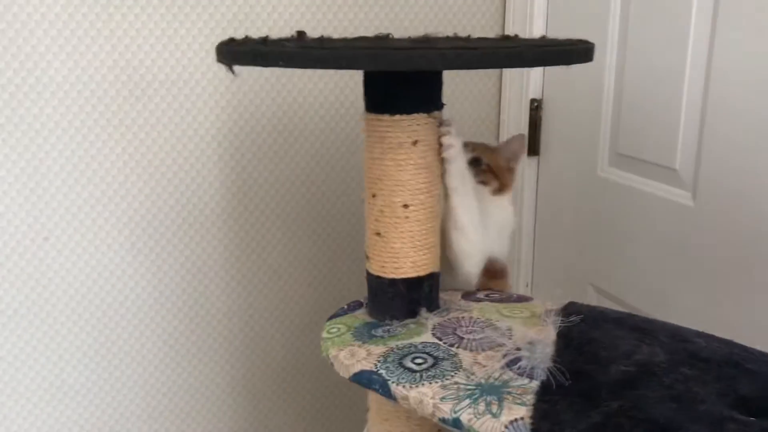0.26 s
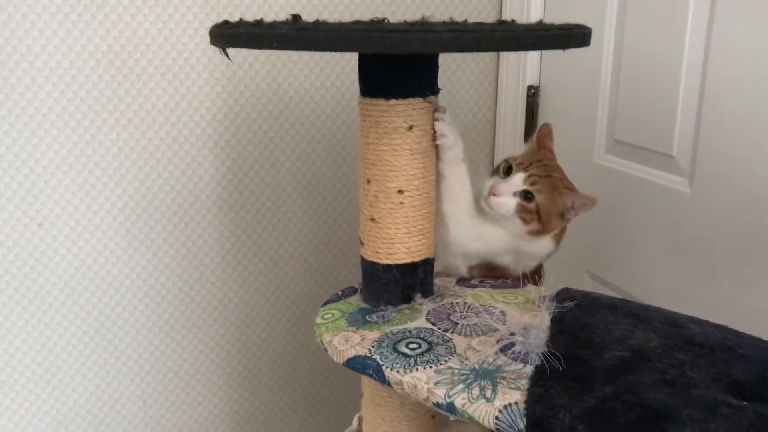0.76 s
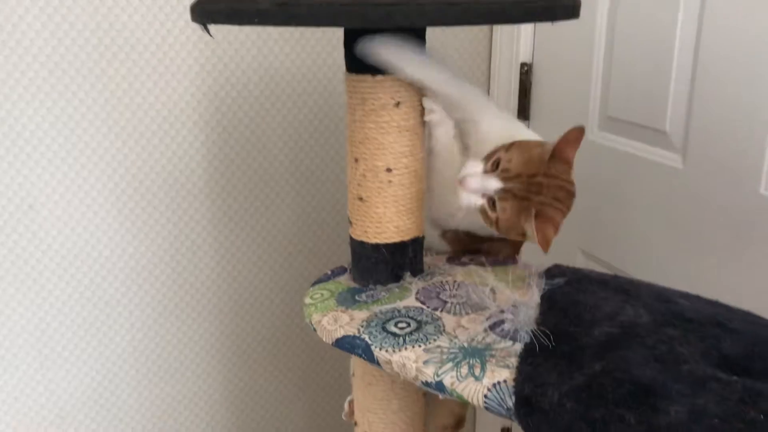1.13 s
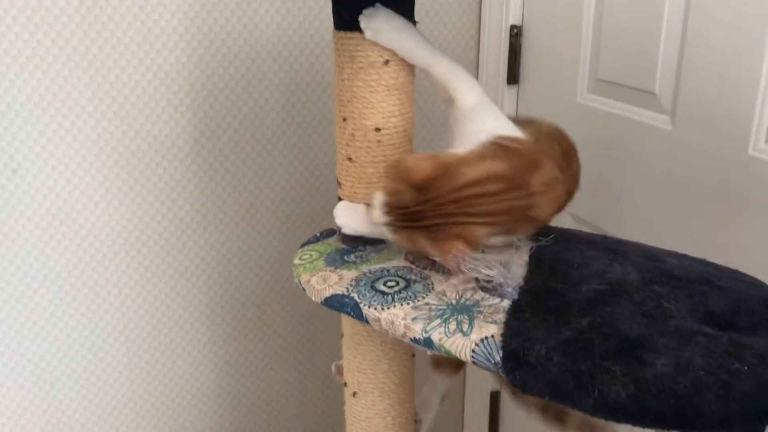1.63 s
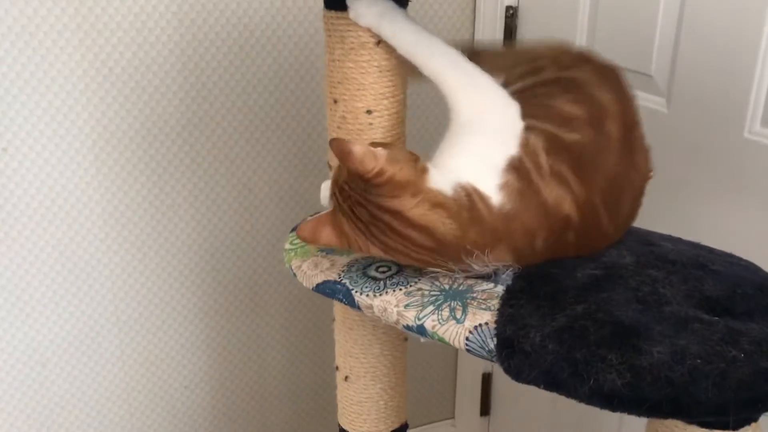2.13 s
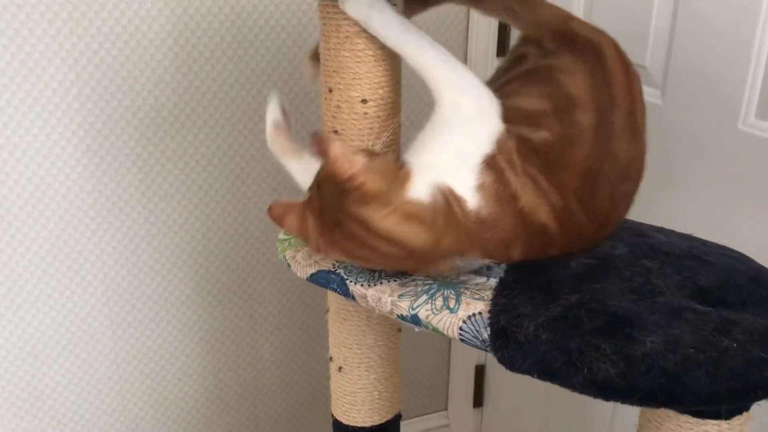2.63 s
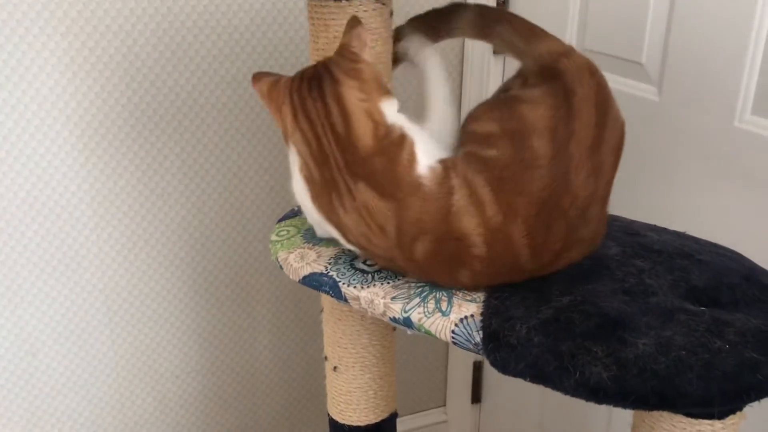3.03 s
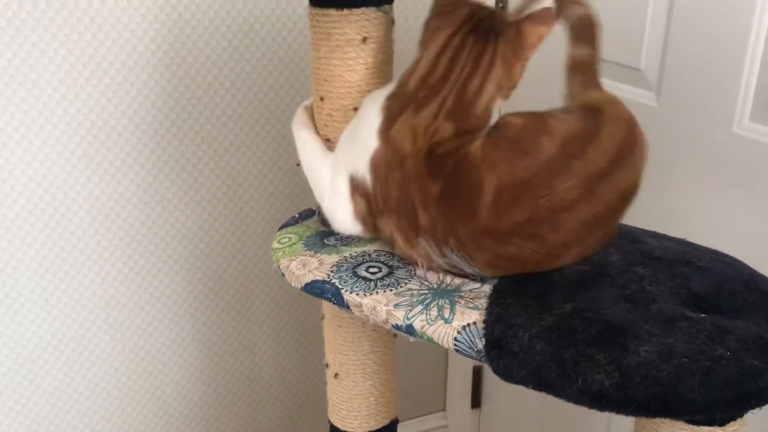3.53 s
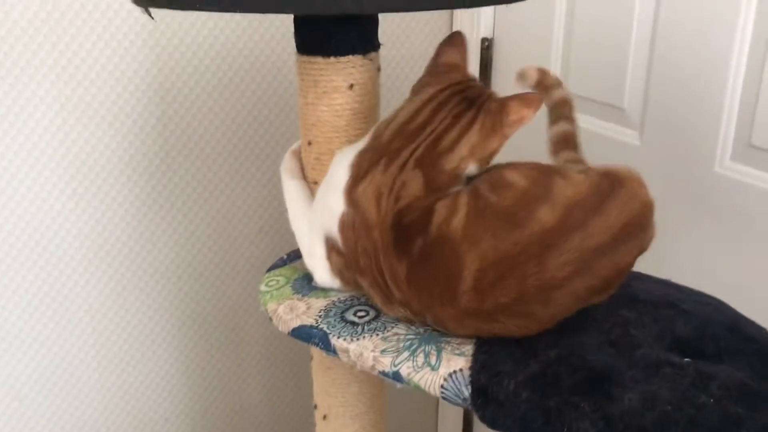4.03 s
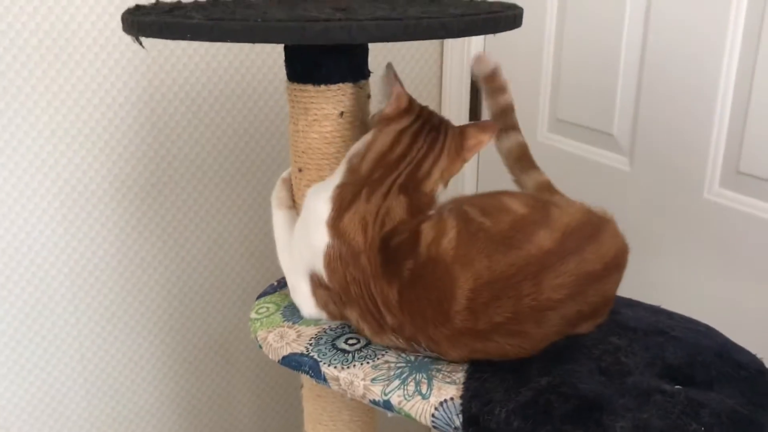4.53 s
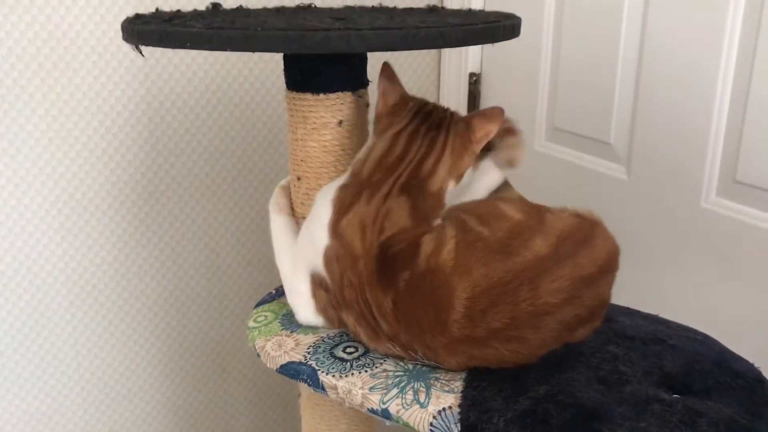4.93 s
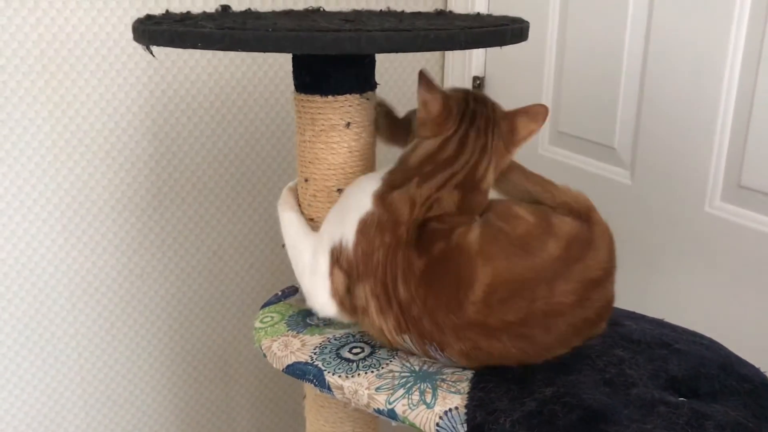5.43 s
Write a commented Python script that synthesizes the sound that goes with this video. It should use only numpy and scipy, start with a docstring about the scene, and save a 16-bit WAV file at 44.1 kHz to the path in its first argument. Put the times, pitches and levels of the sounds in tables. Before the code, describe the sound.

A cat moves on a carpeted climbing tree in a small, quiet, slightly reflective room. A brief flurry of crackling claws and wooden knocks comes first, with a low shudder of the structure. Then come irregular claw ticks, short fibre rips, padded bumps and faint fur rubbing, thinning towards near stillness before one last woody tap. The microphone is fairly near, with soft steady hum and hiss.

```python
"""A cat scrabbles on a carpeted climbing tree in a small quiet room: claws snag and tear out of rope and
cloth as short bursts of fibre snaps, which set boards, post and fibre resonances ringing.
Knocks and bright claw clicks are struck modes, soft bumps are fast-dying sines, rubbing fur is dense
fine snaps. The tree lurches with a shudder of narrow low noise, over a steady low hum near 57 Hz
that slowly fades, and a faint room hum of coloured noise."""
import sys
import numpy as np
from scipy import signal
from scipy.fft import rfft, irfft, next_fast_len
from scipy.io import wavfile
from scipy.ndimage import uniform_filter1d

SR = 44100
rng = np.random.default_rng(int(sys.argv[2]) if len(sys.argv) > 2 else 0)


def elevation(decibels):
    """Turn decibel levels (scalar or array-like) into linear amplitude ratios."""
    levels = np.asarray(decibels, float)
    return 10 ** (levels / 20)


def output_pcm(signal):
    """Save a mono or channel-first signal as 16-bit PCM at the path in sys.argv[1].

    Samples are clipped to [-1, 1] before scaling.
    """
    pcm = np.clip(np.atleast_2d(signal).T, -1, 1) * 32767
    wavfile.write(sys.argv[1], SR, np.round(pcm).astype(np.int16))


N = 249606  # length in samples


def rms_one(x):
    """Scale to rms 1."""
    return x / np.sqrt(np.mean(x ** 2) + 1e-20)


def band(x, low_hz, high_hz):
    """Butterworth band-pass."""
    sos = signal.butter(2, [low_hz, high_hz], "band", fs=SR, output="sos")
    return signal.sosfilt(sos, x)


def coloured(x, spectrum):
    """Shape x by a spectrum drawn over log frequency; rms 1."""
    hz, db = np.transpose(spectrum)
    size = next_fast_len(N)
    grid = np.maximum(np.arange(size // 2 + 1) * SR / size, 1)
    gain = elevation(np.interp(np.log(grid), np.log(hz), db))
    return rms_one(irfft(rfft(x, size) * gain, size)[:N])


def ring(x, hz, t60):
    """Two-pole resonance: a unit click sets a sine of height 1 ringing, down 60 dB after t60 seconds."""
    radius = elevation(-60 / (t60 * SR))
    angle = 2 * np.pi * hz / SR
    poles = [1, -2 * radius * np.cos(angle), radius * radius]
    return signal.lfilter([0, np.sin(angle)], poles, x + 1e-18)


def snaps(per_s, spread_db):
    """Random fibre snaps of uneven size and sign; rms 1."""
    sizes = elevation(spread_db * np.minimum(rng.exponential(1, N), 4))
    signs = rng.choice([-1, 1], N)
    return rms_one(sizes * signs * (rng.random(N) < per_s / SR))


def swells(peak_s, peak_db, swell_s, fade_s):
    """Gain of overlapping gestures, each rising to its peak and fading, 20 dB in the given times."""
    t = np.arange(N) / SR
    swell_s, fade_s = np.maximum(swell_s, .003), np.maximum(fade_s, .003)
    power = np.zeros(N)
    for s, db, up, down in np.broadcast(peak_s, peak_db, swell_s, fade_s):
        distance = np.maximum((s - t) / up, (t - s) / down).clip(0, 8)
        power += elevation(2 * db - 40 * distance)  # doubled dB: power
    return np.sqrt(power)


# claw and paw contacts: t/s, post ring level/dB, board thud level/dB over ring,
# claw sharpness level/dB over ring, tear time constant t/ms (held within 0.5 to 14)
CONTACTS = [(0.017, -35.5, -7, -12.5, 9.8), (0.0259, -35, -12, -0.5, 4.1), (0.067, -43.5, -17, -1, 4.2),
            (0.088, -49, -17, -7, 2.8), (0.113, -41, -2, -3.5, 9.9), (0.119, -31, -8, -5.5, 9.2),
            (0.128, -35, -15, -10, 2.5), (0.145, -25, -38, -8, 5.4), (0.154, -28.5, -8, -5, 4.8),
            (0.1617, -32, -3.5, -6, 5.5), (0.1807, -33, -30, 3.5, 4.8), (0.185, -27.5, -7.5, -22, 3.05),
            (0.187, -43, -11, -6, 1.8), (0.243, -29, -36, -10.5, 4), (0.393, -53.5, -17, -7, 6.1),
            (0.553, -59.5, -12, -2.5, 16), (0.665, -42.5, -3.5, -9.5, 17), (0.762, -60, -12, 1.5, 4.2),
            (0.81, -38.5, -4, -10.5, 5.2), (0.895, -55.5, -19, -6.5, 3.6), (0.94, -48, -16, -3.5, 18.8),
            (0.949, -42.5, -14, -8.5, 7.2), (0.952, -36, -7, -12.5, 2.3), (1.139, -58.5, -13, -6.5, 15.96),
            (1.18, -43.5, -20, -3, 5.9), (1.25, -61.5, -2, -1, 4.9), (1.302, -40.5, -14, -8.5, 2),
            (1.306, -33.5, -10, -12, 3.7), (1.316, -39, -3, -9, 4.2), (1.313, -31, -4.5, -23, 15),
            (1.683, -56, -15, 3, 21), (1.811, -54.5, -3.5, -1.5, 21), (1.879, -47, 6, -13, 2.9),
            (1.955, -47.5, -11, -17, 12), (2.003, -41.5, -12.5, -15, 3.5), (2.128, -53.5, -5, -3.5, 20),
            (2.476, -49, -0.5, -18.5, 16), (2.591, -50, 2.5, -14.5, 11), (2.741, -52, 3.5, -17, 6.5),
            (2.747, -50.5, -20, -17, 4.1), (2.754, -47.5, -5, -14, 6.4), (2.875, -45, -9, 2, 0.45),
            (2.877, -38.5, 1.5, -5.5, 5.5), (2.91, -46, -3, -16, 7.2), (3.1766, -55, -9, 7, 2),
            (3.372, -63, -20, -7.5, 1.5), (3.465, -41, -8.5, -12.5, 6.7), (3.485, -54.5, 6, 0.5, 18),
            (3.506, -42.5, -23, -15, 3.4), (3.556, -47, 3.5, -5.5, 10), (3.569, -48.5, -14, 2, 3.1),
            (3.667, -58, -12, -4.5, 7.9), (4.618, -69, -1, 1, 2.6), (4.647, -51, -27, -11, 18)]


def tears(level_db, fibres):
    """Each contact opens with a sharp snap, then fibres give way at a dying strength."""
    out = np.zeros(N)
    for (s, *_, length_ms), db in zip(CONTACTS, level_db):
        at = round(s * SR)
        length = np.clip(length_ms, .5, 14) * SR / 1000
        fade = np.exp(-np.arange(min(int(6 * length), N - at)) / length)
        tear = fade * fibres[at:at + len(fade)]
        tear[0] = 2.0  # opening snap
        out[at:at + len(fade)] += elevation(db) * tear / np.sqrt(np.sum(tear ** 2))
    return out


def struck(modes, level_db, fibres):
    """Every contact excites every mode with a strength of its own; neighbouring modes alternate in sign."""
    chance_db = rng.normal(0, 2.5, (len(CONTACTS), len(modes)))
    out = np.zeros(N)
    for k, (hz, db, t60) in enumerate(modes):
        # shifted fibres give each mode its own grain
        push = tears(level_db + db + chance_db[:, k], np.roll(fibres, 997 * k))
        out += (-1) ** k * ring(push, hz, t60)
    return out


# board modes: f/Hz, level/dB, t60 t/s
BOARDS = [(166, -8.5, 0.19), (256, -5.5, 0.049), (365, -3, 0.036), (479, -17, 0.066), (511, -8, 0.084),
          (563, -6, 0.051)]
# rope-wound post modes: f/Hz, level/dB, t60 t/s
POST = [(642, -5, 0.024), (780, -1.5, 0.022), (897, 2, 0.018), (1060, 3.5, 0.015), (1109, -8, 0.059),
        (1242, -1.5, 0.027), (1477, -2, 0.017), (1792, 5, 0.0083), (2160, 9.5, 0.004)]
# hollow snap of claw on fibre: f/Hz, level/dB, t60 t/s
FIBRE = [(2530, 1, 0.0051), (3280, 3.5, 0.0048), (4270, 5.5, 0.0039), (5560, 7.5, 0.00071),
         (6700, 7.5, 0.0017)]


def contacts():
    """Tears drive boards, post and fibre resonances, plus a bare crackle and a dry opening click."""
    _, ring_db, thud_db, sharp_db, _ = np.transpose(CONTACTS)
    claw_db = ring_db + sharp_db
    crackle_low_hz, crackle_top_hz, click_top_hz = 3620, 10740, 16700
    fibres = snaps(12000, spread_db=3)
    boards = band(struck(BOARDS, ring_db + thud_db - 3.0, fibres), 78.0, 940.0)
    post = band(struck(POST, ring_db - 6.0, fibres), 320.0, 3900)
    fibre = band(struck(FIBRE, claw_db + 7, fibres), 2610, 10500)
    loose_fibres = snaps(2000, spread_db=4.5)
    crackle = band(tears(claw_db + 26, loose_fibres), crackle_low_hz, crackle_top_hz)
    # without fibres only the opening snap is left
    click = band(tears(claw_db + 19, np.zeros(N)), crackle_low_hz, click_top_hz)
    return boards + post + fibre + crackle + click


# knocks and bright claw clicks on wood and fibre: t/s, level/dB, centre f/Hz,
# fall-off level/dB one octave away
KNOCKS_AND_CLICKS = [(.001, -35, 166, 22), (0.024, -28.5, 163, 38), (.118, -32, 991, 9),
                     (.157, -17, 760, 17), (0.125, -33, 166, 25), (0.16, -24, 165, 20), (0.19, -40, 570, 7),
                     (0.156, -49, 3300, 28), (0.166, -34, 3270, 28), (0.18, -54, 3280, 37),
                     (1.715, -50.5, 1010, 13), (0.953, -34, 1950, 36), (1.184, -42.5, 2050, 31),
                     (1.311, -33.5, 1650, 30), (1.864, -34.5, 300, 5), (2.589, -42, 328, 5),
                     (2.759, -46.5, 2750, 34), (2.763, -46, 2750, 34), (2.878, -34, 540, 11),
                     (3.156, -56, 344, 1), (3.184, -44.5, 1040, 23), (3.558, -32.5, 750, 4.5),
                     (4.647, -56, 1270, 29), (5.42, -32.5, 730, 8)]


def knocks_and_clicks():
    """Each blow rings the modes near its centre pitch most, with a tick that grows with that pitch."""
    s, peak_db, centre_hz, fall_db = np.transpose(KNOCKS_AND_CLICKS)
    at = np.round(s * SR).astype(int)
    ticks, ringing = np.zeros((2, N))
    tick_db, tick_db_per_octave = -3.5, 5.5  # tick over blow for a centre of 700 Hz, and its growth
    ticks[at] = elevation(peak_db + tick_db + tick_db_per_octave * np.log2(centre_hz / 700))
    for k, (hz, db, t60) in enumerate([*BOARDS, *POST, *FIBRE[:2]]):
        blows = np.zeros(N)
        octaves = np.log2(hz / centre_hz)
        blows[at] = elevation(peak_db + db - 2.0 - fall_db * octaves ** 2)
        ringing += (-1) ** k * ring(blows, hz, t60)
    bright = sum(ring(ticks, hz, t60) for hz, _, t60 in FIBRE[:2])
    return band(ringing, 91, 4100) + elevation(-4.5) * bright + band(ticks, 1100, 11000)


# blunt, padded bumps of paws and body weight: t/s, envelope peak level/dB, f/Hz,
# cycles to die by 60 dB (at least 2 are played)
THUMPS = [(1.3024, -29.5, 1550, 20), (1.867, -29, 209, 3), (1.874, -42.5, 511, 31), (1.88, -36, 51.7, 15),
          (1.889, -54, 213, 34), (3.844, -49, 940, 13), (3.891, -43, 980, 6), (3.903, -43, 300, 4.5),
          (4.331, -56, 810, 8), (4.828, -52, 190, 1.5), (5.236, -48, 393, 7), (5.248, -43, 243, -0.5),
          (5.4185, -32, 534, 10), (5.419, -32, 956, 22), (5.4193, -32, 1250, 30), (5.456, -42, 1060, 26),
          (5.458, -46.5, 479, 42), (5.463, -54, 149, 3)]


def thumps():
    """A blunt push under cloth: a sine that swells within half a cycle and dies away, with no edge."""
    out = np.zeros(N + SR)
    t = np.arange(SR // 2) / SR
    for s, db, hz, cycles in THUMPS:
        at = round(s * SR)
        shape = (1 - np.exp(-3 * hz * t)) * elevation(-60 * hz * t / max(cycles, 2))
        out[at:at + len(t)] += elevation(db) * shape / shape.max() * np.sin(2 * np.pi * hz * t)
    return out[:N]


# strokes of fur and cloth rubbing while the cat moves: peak t/s, level/dB,
# t/s to swell by 20 dB, t/s to fade by 20 dB
STROKES = [(0.001, -50, 0.1, 0.1), (1.17, -62, .04, .06), (.158, -39, 0.0327, 0.0769),
           (.842, -66.5, 0.3949, 0.5262), (1.33, -62, .05, .2), (2.006, -57, .15, .13), (3.6, -62, .05, .2),
           (2.7, -66, 0.2493, 0.6439), (4.67, -70, 0.1, .06), (5.27, -72, .1, .3)]
# colour of the rubbing: f/Hz, relative level/dB per Hz
RUB = [(120, -55), (200, -21), (304, -11), (345, -37), (365, -11), (575, -15), (728, -15), (5300, -14.5),
       (15500, -29)]


def rubbing():
    """Dense fine snaps as fur and paws drag over cloth."""
    return swells(*np.transpose(STROKES)) * coloured(snaps(6000, spread_db=3), RUB)


def narrow_noise(hz, width_hz):
    """Noise twice through one resonance of the given width, its swings partly evened out; rms 1."""
    t60 = np.log(1000) / (np.pi * width_hz)
    narrow = ring(ring(rng.standard_normal(N), hz, t60), hz, t60)
    height = uniform_filter1d(np.abs(signal.hilbert(narrow)), size=2000)
    return rms_one(narrow / height ** 0.78)


# the cat shifts its weight and the tree lurches: peak t/s, level/dB,
# t/s to fade by 20 dB (at least 0.003 is played)
LURCHES = [(.001, -32.5, 0.08), (.21, -32.5, 0.11), (.49, -68, -0.5), (0.991, -47, -0.02),
           (1.347, -40, 0.14), (1.539, -55.5, 0.36), (1.64, -55, -0.7), (2.81, -54.5, 0.4),
           (2.92, -45.5, 0.23), (3.14, -57, -0.2), (3.66, -58.5, 0.34), (4.35, -66, -0.8), (4.84, -59, 0.3)]


def lurches():
    """The tree shudders in each lurch: noise in a narrow low resonance swells and fades."""
    s, db, fade_s = np.transpose(LURCHES)
    return swells(s, db, 0.092, fade_s) * narrow_noise(49.75, width_hz=10.5)


def low_hum():
    """A steady low hum near 57 Hz under the lurches, slowly fading throughout: narrow noise."""
    start_db, fade_db_per_s = -61.5, 1.24
    gain = elevation(start_db - fade_db_per_s * np.arange(N) / SR)
    return gain * narrow_noise(57.1, width_hz=8.7)


# reverberation bands: centre f/Hz, t60 t/s, level/dB
ROOM = [(165, 0.18, 2.5), (288, 0.38, 0), (605, 0.25, 0), (1210, 0.32, -5), (2480, 0.31, -4),
        (5240, 0.38, -8), (9800, 0.48, -12.5)]


def room(x):
    """Reflections as octave bands of noise that start after 4 ms, each dying at its own rate."""
    t = np.arange(SR // 2) / SR
    tail = np.zeros(len(t))
    for hz, t60, db in ROOM:
        noise = band(rng.standard_normal(len(t)), hz / np.sqrt(2), hz * np.sqrt(2))
        dying = noise * elevation(-60 * t / t60) * (t > .004)
        share = np.sqrt(hz / np.sqrt(2) / (SR / 2))  # the band's part of the whole spectrum
        tail += elevation(db) * share * dying / np.sqrt(np.sum(dying ** 2))
    return signal.fftconvolve(x, tail)[:N]


# room hum below, room and microphone hiss above: f/Hz, relative level/dB per Hz
HUM = [(44, -46), (75, -2), (129, -9), (164, -8), (361, -8.5), (905, -18), (990, -17), (1210, -19.5),
       (1900, -25), (5000, -28.5), (9400, -29.5), (10500, -36), (12000, -30.5), (16000, -34)]


def room_hum():
    """Steady noise in the colour of the room's hum and the hiss."""
    return elevation(-64.3) * coloured(rng.standard_normal(N), HUM)


def scene():
    """Cat on the tree, its reverberation, the lurches, the low hum and the room hum."""
    claws = contacts() + rubbing()
    blows, body = knocks_and_clicks(), thumps()
    room_send = claws + elevation(-1.5) * blows + elevation(-2.5) * body
    return (claws + blows + body + room(room_send) + lurches() + low_hum() + room_hum())[None]


def low_pass(x):
    """Removes everything above the highest recorded frequency."""
    return signal.sosfilt(signal.butter(12, 16530, fs=SR, output="sos"), x)


def record(dry):
    """The microphone drops the deepest bass, then a steep low-pass cuts the top."""
    low_cut = signal.butter(4, 40.3, "high", fs=SR, output="sos")
    top_cut = signal.cheby2(12, 70, 16900, fs=SR, output="sos")  # 70 dB down from 16900 Hz
    heard = signal.sosfilt(low_cut, dry)
    finished = signal.sosfilt(top_cut, heard)
    return low_pass(finished)


dry = scene()
out = record(dry)
output_pcm(out)
```